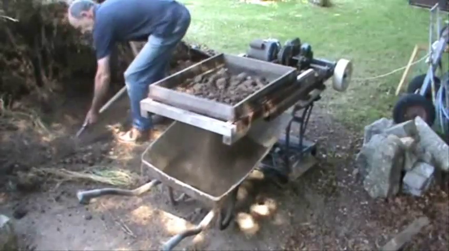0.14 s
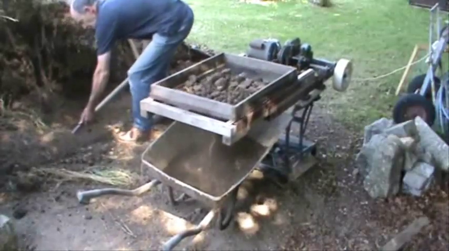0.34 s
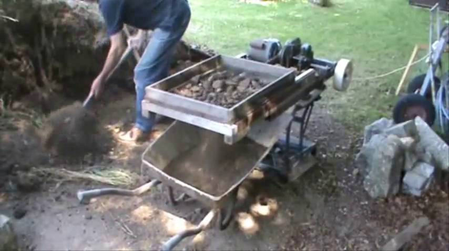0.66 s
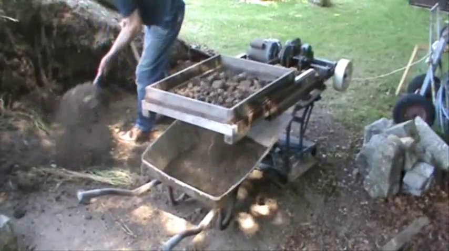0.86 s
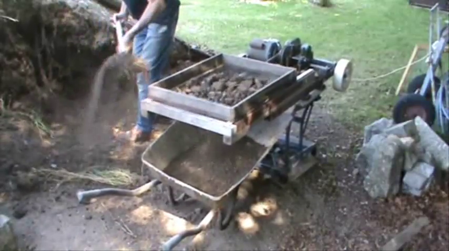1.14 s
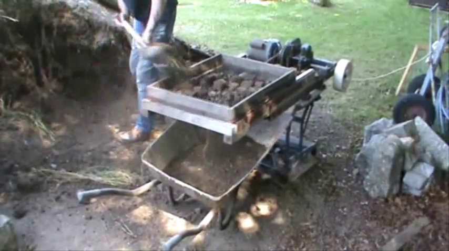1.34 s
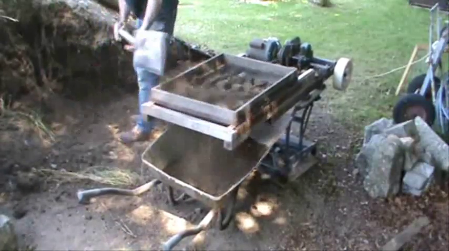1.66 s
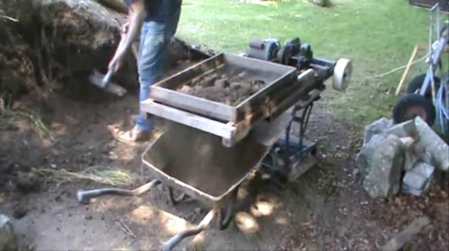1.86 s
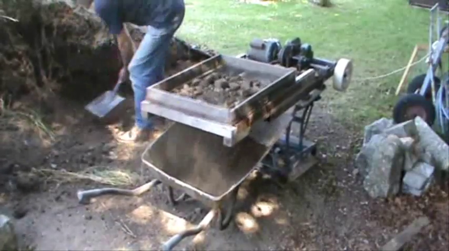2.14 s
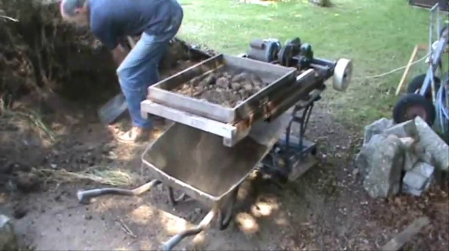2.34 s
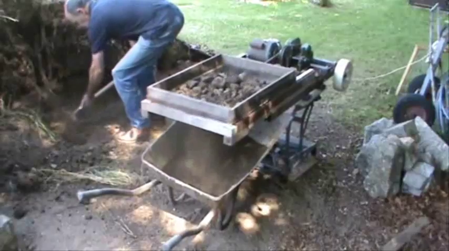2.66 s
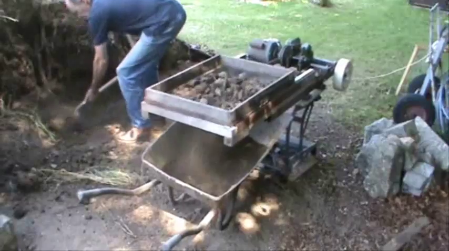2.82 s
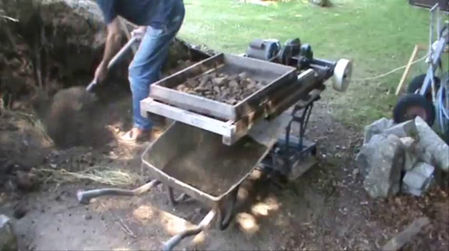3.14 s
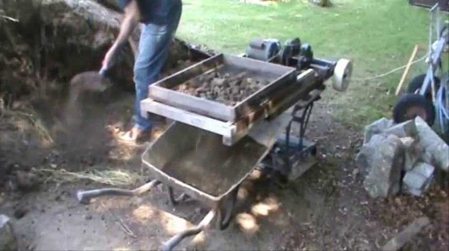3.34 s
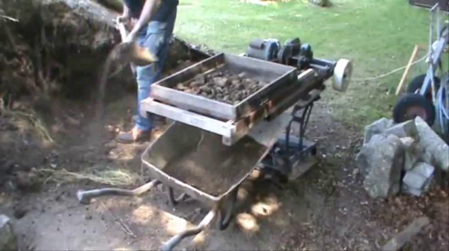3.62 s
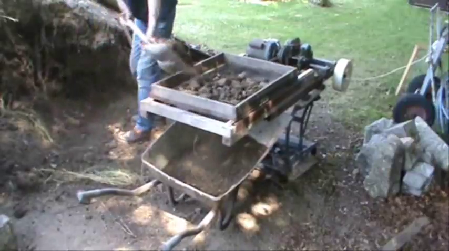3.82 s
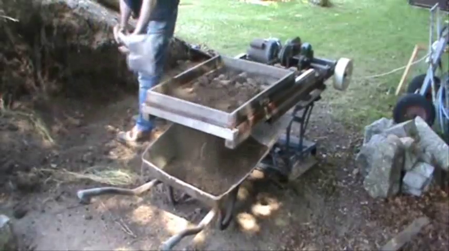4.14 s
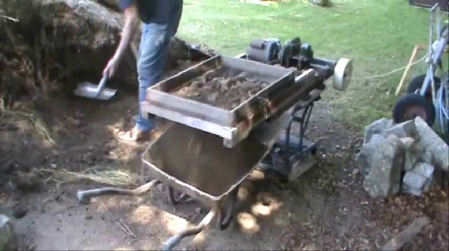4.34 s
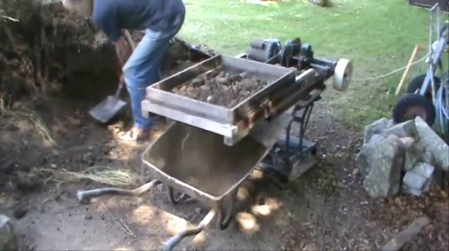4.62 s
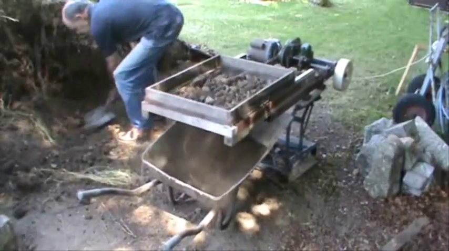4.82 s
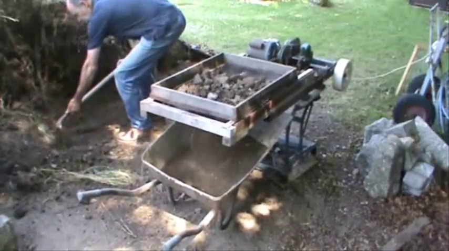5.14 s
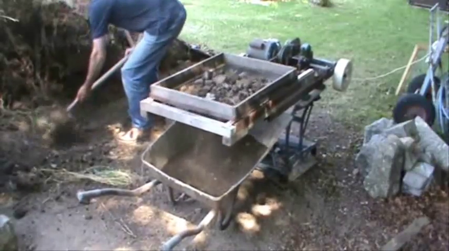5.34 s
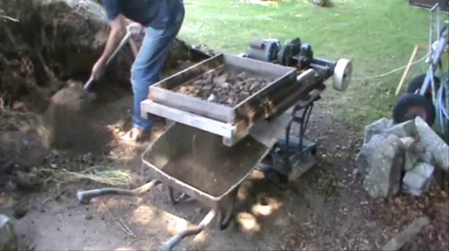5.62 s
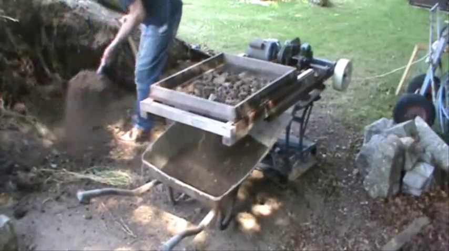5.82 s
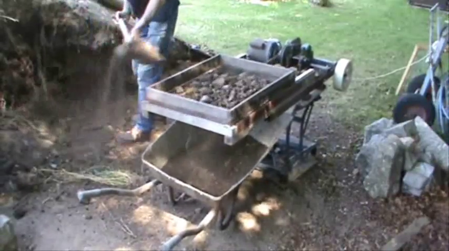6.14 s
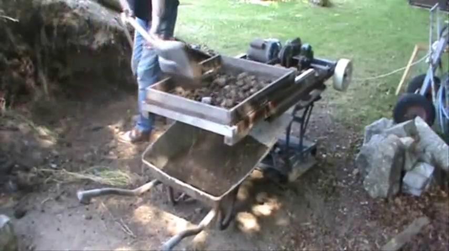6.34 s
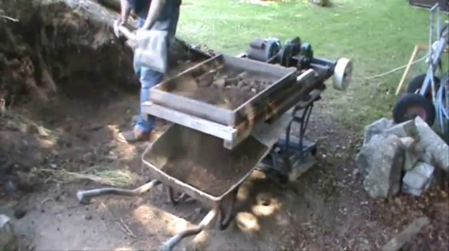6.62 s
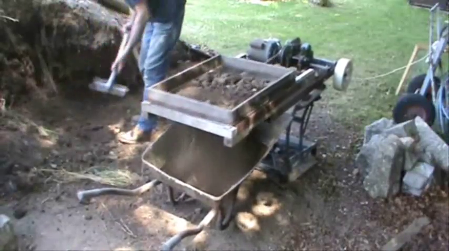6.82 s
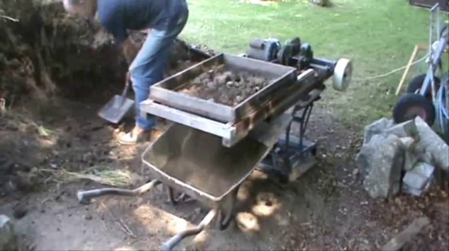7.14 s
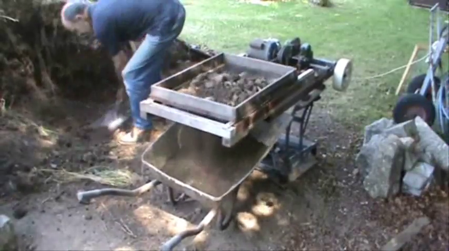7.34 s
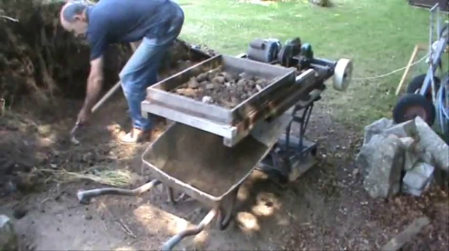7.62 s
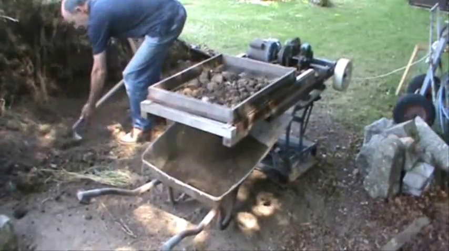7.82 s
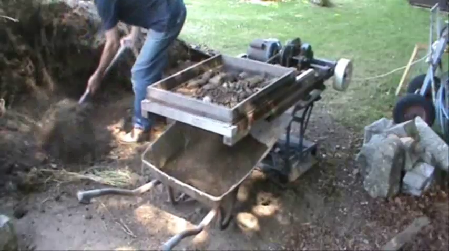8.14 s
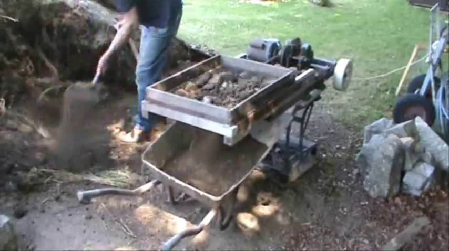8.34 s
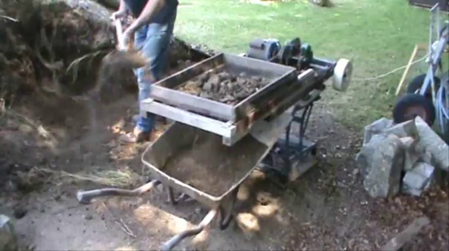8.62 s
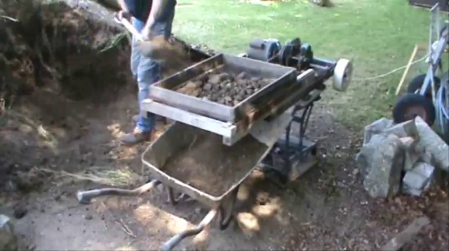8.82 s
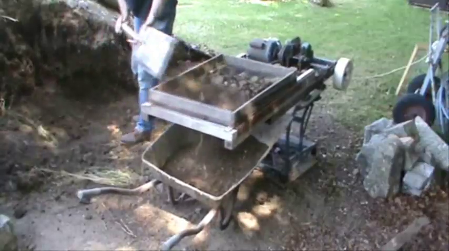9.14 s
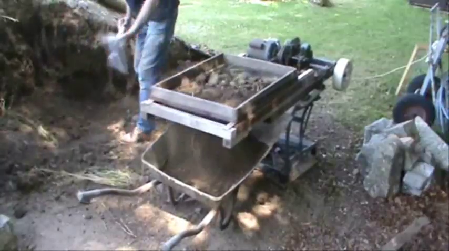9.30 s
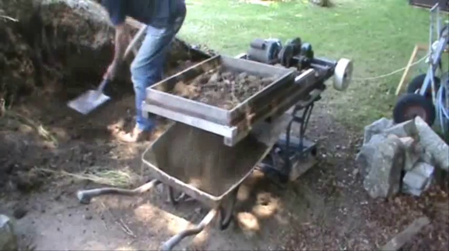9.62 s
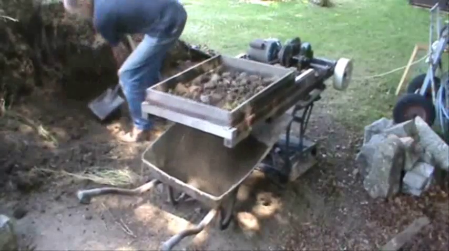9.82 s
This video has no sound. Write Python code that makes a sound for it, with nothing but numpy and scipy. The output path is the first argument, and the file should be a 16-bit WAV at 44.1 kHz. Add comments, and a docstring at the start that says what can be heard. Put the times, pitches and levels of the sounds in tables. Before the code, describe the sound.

Outdoors in a garden, a close stereo pair hears a motorised soil sieve already at full speed, and it never stops through the ten seconds. It shakes about 4.5 times a second: each stroke brings a dense, bright rattle of stones, hard slams as the load is thrown forward and back, a thin high ping from the steel mesh and a short hollow knock from the linkage. The wooden frame drums and chatters, clods thud irregularly, and fine soil hisses in pulses. Low motor and belt rumble lies underneath. A spade scrapes briefly through gritty ground at 0, 2.5, 5 and 7.4 seconds, each about a quarter second long. Heavy loads make the tray boom softly, mostly before 3 seconds, and occasionally up to 5.6. Sharp pebble ticks drop into a barrow throughout. The sound is dry, harsh and crowded, still running at the end.

```python
"""In a garden, before a microphone pair, a motor-driven soil sieve shakes at 4.5 strokes a second.
It is already running over its motor's rumble as a spade digs; the spade scrapes again near 2.5, 5 and 7.4 s.
Fine soil hisses from filtered grit, stones rattle in noise clicks and short rings, and the frame drums.
From the first strokes clods thud, the load slams, the mesh pings in sine modes and pebbles tick in a barrow.
The linkage knocks at the end of nearly every stroke, and some heavy loads make the hollow tray boom."""
import sys
import numpy as np
from scipy import signal
from scipy.fft import rfft, irfft, next_fast_len
from scipy.io import wavfile
from scipy.ndimage import map_coordinates

SR = 44100
rng = np.random.default_rng(int(sys.argv[2]) if len(sys.argv) > 2 else 0)


def wrap_up_sound(samples):
    """Save the sound to the file named by the first command line argument, as 16-bit audio."""
    columns = np.atleast_2d(samples).T
    # keep every value between -1 and 1, then stretch to whole-number steps
    tamed = np.clip(columns, -1, 1)
    steps = np.round(tamed * 32767).astype(np.int16)
    wavfile.write(sys.argv[1], SR, steps)


N = 439677


def amp(db):
    """Decibels to gain."""
    return np.exp(np.asarray(db) * (np.log(10) / 20))


def unit(x):
    """Scaled to rms 1."""
    return x / np.sqrt(np.mean(x ** 2) + 1e-20)


def along(points, hz):
    """(Hz, value) points read on a log frequency axis."""
    f, v = np.transpose(points)
    return np.interp(np.log(hz + 1), np.log(f + 1), v)


def curves(rows):
    """One value per sample for each column after the time."""
    s, *cols = np.transpose(rows)
    return [np.interp(np.arange(N) / SR, s, c) for c in cols]


def wobble(rate):
    """A smooth random curve, rate knots a second."""
    at = np.arange(0, N + 32, 32)
    knots = rng.standard_normal(int(N * rate / SR) + 4)
    return np.interp(np.arange(N), at, map_coordinates(knots, [at * rate / SR]))


def coloured(x, gain_db, size=8192):
    """x through a causal, minimum-phase filter with the given dB at each frequency."""
    cepstrum = irfft(np.log(amp(gain_db(np.fft.rfftfreq(size, 1 / SR))) + 1e-6))
    # folding the cepstrum forward makes the filter causal
    cepstrum[1:size // 2] *= 2
    cepstrum[size // 2 + 1:] = 0
    response = irfft(np.exp(rfft(cepstrum)))[:size // 2]
    return signal.oaconvolve(x, response)[:N]


def ring(x, hz, width_hz):
    """x through a steep-sided resonance: two equal stages, each of the given width."""
    stage = np.concatenate(signal.iirpeak(hz, hz / width_hz, SR))
    return signal.sosfilt([stage, stage], x)


def add(track, s, sound):
    """Mix a sound in at time s."""
    start = int(np.clip(round(s * SR), 0, N))
    track[start:start + len(sound)] += sound[:N - start]


def impacts(rate, spread_db):
    """Random contacts, rate a second, each of its own size."""
    at = np.flatnonzero(rng.random(N) < rate / SR)
    size = rng.choice([-1, 1], len(at)) * amp(spread_db * rng.uniform(-0.73, 1, len(at)))
    return unit(np.bincount(at, size, N))


def clumps(rate, life, depth):
    """Gain of a crowd of contacts that arrives in clumps: each starts at once and dies away."""
    starts = (rng.random(N) < rate / SR) * 1.0
    power = signal.lfilter([1], [1, -np.exp(-1 / (life * SR))], starts)
    return unit(np.sqrt(1 + depth * power))


def blow(modes, detune, crack_db):
    """One hard contact, peaking near 1: a brief crack and modes that differ a little every time."""
    t = np.arange(SR // 12) / SR
    ringing = np.zeros(len(t))
    for hz, db, t60 in modes:
        decay = amp(db + 1.3 * rng.normal() - 60 * t / t60)
        ringing += decay * np.sin(2 * np.pi * hz * (1 + detune * rng.normal()) * t)
    crack = amp(crack_db - 60 * t / .012) * ring(rng.standard_normal(len(t)), hz=1700, width_hz=2600)
    sound = ringing * (1 - np.exp(-t / .0004)) + crack
    return .4 * sound / sound[t < .01].std()


def rung(events, hz, spread, attack):
    """One dying tone for each (s, dB, t60 s) event, its pitch scattered around hz."""
    out, t = np.zeros(N), np.arange(SR // 5) / SR
    for (s, db, t60), tone in zip(events, rng.uniform(-1, 1, len(events))):
        envelope = amp(db - 60 * t / t60) * (1 - np.exp(-t / attack))
        add(out, s, envelope * np.sin(2 * np.pi * hz * (1 + spread * tone) * t))
    return out


# The crank's progress. Each row: time in seconds, turns completed.
CRANK_TURNS = [(0, .45), (1.217, 6), (2.31, 11), (3.622, 17), (4.279, 20), (5.599, 26), (6.475, 30),
               (7.567, 35), (8.664, 40), (9.979, 46)]


def each_turn(share):
    """The times at which the crank passes a given point of its turn."""
    s, turns = np.transpose(CRANK_TURNS)
    marks = np.arange(int(turns[-1])) + share
    return np.interp(marks[marks > turns[0]], turns, s)


SIZE_SCATTER_DB = 2.5


def falls(share, chance, db, scatter_s):
    """(s, dB) of things that land near one point of the turn, on some strokes only."""
    times = each_turn(share)
    late, size, luck = rng.random((len(times), 3)).T
    when = times + scatter_s * (2 * late - 1)
    levels = db + SIZE_SCATTER_DB * (2 * size - 1)
    return [(s, level) for s, level, draw in zip(when, levels, luck) if draw < chance]


# Resonances of the tray and its mesh. Each row: centre in Hz, width in Hz, peak or hollow in dB.
TRAY_RESONANCES = [(463, 32, 3.5), (598, 48, -3), (665, 48, 1), (703, 640, 4), (910, 51, -6.5),
                   (1065, 71, 1), (1410, 76, 4), (1620, 70, -0.5), (1890, 53, 2), (2250, 190, 0),
                   (2760, 79, -2.5), (3860, 160, 3), (4180, 120, 1.5), (4460, 110, 1.5), (6360, 150, 1.5)]


def tray_db(hz):
    """Peaks and hollows of the tray's response."""
    return sum(db / (1 + (2 * (hz - centre) / width) ** 2) for centre, width, db in TRAY_RESONANCES)


# Rumble of the motor and belt. Each row: frequency in Hz, relative spectrum in dB per Hz.
DRIVE_SPECTRUM = [(20, -64), (32, -32), (50, -9), (72, -3), (120, -2.5), (175, 1.5), (230, -1.5),
                  (400, -3.5), (1500, -36.5)]


def drive():
    """Motor, belt and pulleys rumble evenly under the rattle: steady filtered noise."""
    return amp(-38) * unit(coloured(rng.standard_normal(N), lambda hz: along(DRIVE_SPECTRUM, hz)))


# The spade thrust into stony ground. Each row: start in seconds, length in seconds, level in dB.
SPADE_THRUSTS = [(0, 0.18, -23.5), (2.55, 0.29, -26), (4.97, 0.25, -21), (7.442, 0.28, -21)]
# Its scrape. Each row: frequency in Hz, relative spectrum in dB per Hz.
SPADE_SPECTRUM = [(200, -19), (700, 1.5), (1400, -4.5), (2600, -0.5), (4500, -3), (7000, -10), (11000, -10),
                  (15000, -47)]


def spade():
    """Grit scrapes along the blade, swelling and fading with each thrust."""
    push = np.zeros(N)
    for s, length, db in SPADE_THRUSTS:
        add(push, s, amp(db) * np.sin(np.linspace(0, np.pi, int(length * SR))))
    grit = impacts(5000, spread_db=-1) * clumps(rate=180, life=0.0066, depth=0.51)
    return push * unit(coloured(grit, lambda hz: along(SPADE_SPECTRUM, hz)))


# The hiss of fine soil. Each row: frequency in Hz, relative spectrum in dB per Hz.
SOIL_SPECTRUM = [(2000, -20), (6000, 2), (8000, -2.5), (9800, 1), (11200, -1), (12800, -6), (14000, -16),
                 (15000, -62)]


def soil(level_db, flow_db):
    """Grit sprays through the mesh in little spurts that swell with each throw."""
    grit = impacts(13000 * amp(flow_db), spread_db=1.5) * amp(0.69 * flow_db)
    grit *= clumps(rate=45, life=0.0078, depth=1.0)
    return amp(level_db + 2.17) * unit(coloured(grit, lambda hz: along(SOIL_SPECTRUM, hz)))


def chips(throw_db, rate, life, size=400):
    """Hard, dry clicks of stone edges: each starts at once and is over in a few milliseconds."""
    at = np.flatnonzero(rng.random(N) < rate * amp(throw_db) / SR)
    strength = amp(rng.uniform(-3, 3, (len(at), 1)))
    fade = np.exp(-np.arange(size) / (life * SR))
    cracks = strength * rng.standard_normal((len(at), size)) * fade
    places = (at[:, None] + np.arange(size)).ravel()
    return unit(ring(np.bincount(places, cracks.ravel(), N)[:N], hz=3720, width_hz=5540))


def clinks(throw_db, rate, pitch_hz, spread, cycles, size=1200):
    """Single stones that stand out, each with a short ring of its own pitch."""
    at = np.flatnonzero(rng.random(N) < rate * amp(throw_db) / SR)
    tone, strength = rng.uniform(-1, 1, (2, len(at), 1))
    hz, t = pitch_hz * np.exp(spread * tone), np.arange(size) / SR
    rings = amp(4.0 * strength) * np.sin(2 * np.pi * hz * t) * np.exp(-t * hz / cycles)
    places = (at[:, None] + np.arange(size)).ravel()
    return unit(np.bincount(places, rings.ravel(), N)[:N])


# Stones by size, from clods to chips. Each row: pitch in Hz, width of each stage in Hz, relative level in dB.
STONE_SIZES = [(1083, 1060, -8), (1860, 1250, -8), (2686, 1030, -6.5), (3515, 1130, -7), (4460, 1280, -6),
               (5510, 2140, -8.5)]


def stones(level_db, throw_db):
    """Each size of stone clicks at its own pitch, thicker and harder each time the tray turns round."""
    rate = 2600 * amp(throw_db)
    clicks = sum(amp(db) * unit(ring(impacts(rate, spread_db=2), hz, width)) for hz, width, db in STONE_SIZES)
    clicks = unit(clicks) * clumps(rate=55, life=.008, depth=.4)
    clicks += amp(-6.5) * chips(throw_db, rate=230, life=.0014)
    # stone on stone, then stone on wire
    clicks += amp(-10) * clinks(throw_db, rate=200, pitch_hz=2455, spread=0.417, cycles=14.5)
    clicks += amp(-12.0) * clinks(throw_db, rate=85, pitch_hz=4330, spread=.22, cycles=95)
    return amp(level_db + 0.86) * unit(coloured(clicks * amp(0.42 * throw_db), tray_db))


def chatter(share, hz, width_hz, life, scatter_db=3, scatter_s=0.00352):
    """Once a turn a loose part chatters briefly and rings at its own pitch."""
    t, out = np.arange(SR // 8) / SR, np.zeros(N)
    fade = np.exp(-t / life)
    times = each_turn(share)
    bursts = ring(rng.standard_normal((len(times), len(t))) * fade, hz, width_hz)
    scatter = rng.uniform(-0.998, 1, (len(times), 2))
    for when, burst, (late, size) in zip(times, bursts, scatter):
        levelled = burst * np.linalg.norm(fade) / np.linalg.norm(burst)
        add(out, when + scatter_s * late, amp(scatter_db * size) * levelled)
    return out


# The frame's drumming. Each row: frequency in Hz, relative spectrum in dB per Hz.
FRAME_SPECTRUM = [(30, -46), (120, -15.5), (250, -7), (400, -1.5), (600, 1), (900, -6), (1400, -9),
                  (3000, -35)]
# Jolts in every stroke. Each row: share of a turn, level in dB, ring in Hz, width of each stage in Hz,
# chatter's decay in seconds.
FRAME_JOLTS = [(.1, -37.5, 145, 110, 0.015), (.12, -24, 1240, 452, 0.01), (.115, -29.5, 349, 170, 0.027),
               (.165, -31, 740, 260, 0.032), (.18, -39, 459.1, 50, 0.021), (.23, -25, 752, 170, 0.011),
               (.295, -20.5, 1600, 900, 0.005), (.32, -31, 715, 260, .009), (.49, -35, 458, 60, 0.027),
               (.535, -27.5, 350, 150, 0.0071), (.57, -27.5, 700, 260, 0.0049),
               (.555, -24.5, 1660, 1200, 0.018), (.555, -29, 1895, 80, 0.024), (.64, -33, 345, 160, 0.02),
               (.62, -25, 1340, 400, 0.011), (.65, -23, 735, 190, 0.0074)]


def frame(level_db, throw_db):
    """Clods drum on the wooden frame, which is jolted near the same points of every stroke."""
    hits = impacts(1400, spread_db=6.5) * amp(0.062 * throw_db) * clumps(rate=32, life=0.026, depth=0.78)
    drumming = unit(coloured(hits, lambda hz: along(FRAME_SPECTRUM, hz) + tray_db(hz)))
    jolts = sum(amp(db) * chatter(share, hz, width, life) for share, db, hz, width, life in FRAME_JOLTS)
    return amp(level_db - 1.4) * drumming + jolts + boom()


# The heaviest clods against the wood. Each row: time in seconds, peak in dB, approximately.
CLOD_THUDS = [(.017, -11.5), (.082, -15), (1.256, -15), (1.703, -19), (2.707, -15), (2.774, -17),
              (2.8, -12), (3.017, -12), (4.555, -17), (5.202, -19), (5.299, -16), (5.648, -14),
              (7.491, -14), (7.694, -12), (7.844, -20), (7.93, -16), (8.502, -14), (8.81, -11),
              (9.603, -17), (9.687, -13)]
# The frame's modes. Each row: pitch in Hz, relative level in dB, fall by 60 dB in seconds.
WOOD_MODES = [(460, -12, .05), (560, -11, .03), (675, -4, .04), (750, 0, .046), (815, -6, .03),
              (1060, -8, .02)]


def clods():
    """Heavy clods trail behind the stones and clack against the wood, exciting its modes."""
    out = np.zeros(N)
    after_forward = falls(share=0.19, chance=.3, db=-17.5, scatter_s=0.01205)
    later = falls(share=.6, chance=.3, db=-22, scatter_s=.014)
    for s, db in CLOD_THUDS + after_forward + later:
        add(out, s, amp(db) * blow(WOOD_MODES, detune=0.029, crack_db=6))
    return out


# The load slams into the front of the tray. Each row: time in seconds, relative level in dB.
FRONT_SLAMS = [(0.367, -5), (0.594, -7), (0.813, -11), (1.023, -2), (1.239, -1), (1.461, -3), (1.685, -5),
               (1.903, -4.5), (2.334, 1), (2.561, -12), (2.999, -6.5), (3.211, -4), (3.43, -2), (3.649, 0),
               (3.869, 0.5), (4.09, -4.5), (4.301, -8.0), (4.528, -14), (4.747, -1), (6.287, -8.0),
               (6.501, -1.5), (6.94, -6.0), (7.167, -3), (7.377, -9), (7.601, -8), (7.824, -11),
               (8.038, -1.5), (8.254, -10), (8.466, -5), (8.693, -4), (8.912, -9.5), (9.14, -10),
               (9.341, 0), (9.793, -7)]
# The load is thrown back; slams() and mesh() both play this.
# Each row: time in seconds, relative slam level in dB, relative ping level in dB.
RETURN_THROWS = [(0.03, -6, -24.0), (0.254, -10, -33.0), (0.473, -6.0, -29.0), (0.692, -3.5, -33.0),
                 (0.908, -7.5, -33.0), (1.129, -2, -28.0), (1.347, -3, -29.0), (1.565, -3.5, -25.5),
                 (1.788, -7.5, -27.0), (2.005, 0, -19.0), (2.224, -3, -29.0), (2.444, -6.5, -23),
                 (2.664, -6, -26.5), (2.88, -4, -24.0), (3.098, -0.5, -21.5), (3.313, -2.0, -32.0),
                 (3.539, -6, -27.0), (3.755, -4.5, -23.0), (3.97, -2, -25.0), (4.189, -3, -25.5),
                 (4.414, -6, -20), (4.634, -7, -25.5), (4.854, -4.0, -25.0), (5.074, -1.5, -20),
                 (5.292, -9, -19), (5.511, -3.0, -23.0), (5.729, -2, -27.0), (5.948, 1, -25.0),
                 (6.168, -7, -21.0), (6.386, -4, -18), (6.609, -5, -20), (6.822, -3, -19), (7.045, -3, -19),
                 (7.258, 0, -24.0), (7.484, -3, -20), (7.706, -4, -26.5), (7.924, -6, -21.0),
                 (8.142, -8, -20), (8.355, -4.5, -19), (8.575, 0, -21.5), (8.8, -3.0, -19),
                 (9.012, 0.5, -20.0), (9.237, -3, -20), (9.45, -1, -33.0), (9.679, -1, -24.0),
                 (9.899, -1.5, -29.0)]


def slams():
    """The load crashes down at either end of the throw: a hard smack, then a volley that dies away."""
    force, t = np.zeros(N), np.arange(SR // 8) / SR
    fall = .8 * amp(-60 * t / .045) + .5 * amp(-60 * t / .15)
    for s, db, *_ in FRONT_SLAMS + RETURN_THROWS:
        add(force, s, amp(db) * fall)
    volley = ring(force * rng.standard_normal(N), hz=3570, width_hz=4000)
    return amp(-8.5) * coloured(volley, tray_db)


# The steel mesh's modes. Each row: pitch in Hz, relative level in dB, fall by 60 dB in seconds.
MESH_MODES = [(4135, 5, .085), (4270, -5, .05), (4440, -3, .06)]


def mesh():
    """The return throw sets the steel mesh ringing, always with the same modes, slightly detuned."""
    out = np.zeros(N)
    for hz, db, t60 in MESH_MODES:
        pings = [(s, ping_db, t60) for s, _, ping_db in RETURN_THROWS]
        out += amp(db) * rung(pings, hz, spread=.007, attack=.0005)
    return out


# The loudest pebbles strike the barrow. Each row: time in seconds, relative level in dB.
LOUD_PEBBLES = [(0.7871, -9), (2.252, -8), (2.4623, -9), (3.408, -9), (5.3248, -9), (5.574, -8.5),
                (6.4181, -8), (8.5614, -10), (9.273, -11), (9.5266, -10)]
# Their tick. Each row: frequency in Hz, filter gain in dB.
TICK_SPECTRUM = [(2000, -30), (6000, -12), (8000, -3.5), (10500, 4.5), (12500, -1), (15000, -23)]
PEBBLES_AT = .82  # smaller pebbles drop through after the return throw (share of a turn)


def pebbles():
    """Sharp bright ticks with a brief sizzle: short bursts of filtered noise."""
    out, t = np.zeros(N), np.arange(SR // 10) / SR
    for s, db in LOUD_PEBBLES + falls(PEBBLES_AT, chance=.35, db=-13.5, scatter_s=0.026):
        add(out, s, amp(db - 3 - 60 * t / .08) * rng.standard_normal(len(t)))
    return coloured(out, lambda hz: along(TICK_SPECTRUM, hz))


# The linkage takes up its slack. Each row: time in seconds, relative peak in dB, brightness in dB before scaling.
LINKAGE_KNOCKS = [(0.116, -14, 4.0), (0.336, -9.5, 1.0), (0.55, -11, -4), (0.769, -11.0, -2),
                  (1.207, -12, -0.5), (1.427, -10.5, 1.0), (1.645, -11.5, 1), (1.864, -14.5, -3),
                  (2.082, -12.0, -3.0), (2.307, -10.5, 3), (2.524, -10.5, 0), (2.745, -9.0, -1.0),
                  (2.962, -12.5, 1.5), (3.184, -10, 6), (3.396, -12, 3), (3.615, -12, -5),
                  (3.837, -9.5, -5), (4.054, -10, 0), (4.27, -19.5, -3.0), (4.49, -10, -7),
                  (4.715, -11.5, 6), (4.933, -9.5, -0.5), (5.154, -13.5, 0.0), (5.369, -10.5, -2),
                  (5.592, -11, -3), (5.81, -11, 0.0), (6.03, -11.5, 0.0), (6.247, -12, -2.0),
                  (6.468, -10.5, 1.5), (6.687, -12, -1.5), (6.906, -13, -10), (7.134, -8, -4.0),
                  (7.57, -12.0, 2), (7.785, -12.5, 1), (8.008, -15, 2.0), (8.225, -11.5, -4),
                  (8.442, -12.5, 0), (8.662, -11, -4), (8.879, -12, 1), (9.098, -12, -2.5),
                  (9.311, -13, 0.5), (9.535, -15.5, -1.0), (9.758, -11.5, 0.5)]
# The knock's modes. Each row: pitch in Hz, relative level in dB, fall by 60 dB in seconds.
LINKAGE_MODES = [(775, -8.5, .06), (1165, -2, .05), (1235, -1, .042), (1300, -5, .034), (1390, -5, .034),
                 (1660, -9, .025)]
KNOCK_DETUNE = .013  # typical share by which a mode's pitch changes from knock to knock
KNOCK_PIVOT_HZ, KNOCK_SPAN_HZ = 1270, 130  # a bright blow favours the modes above the pivot


def linkage():
    """A short hollow knock at the end of nearly every stroke, now duller, now brighter."""
    out = np.zeros(N)
    for s, db, bright_db in LINKAGE_KNOCKS:
        modes = []
        for hz, level, t60 in LINKAGE_MODES:
            tilt = np.tanh((hz - KNOCK_PIVOT_HZ) / KNOCK_SPAN_HZ)
            modes.append((hz, level + .6 * bright_db * tilt, t60))
        add(out, s, amp(db + 0.3) * blow(modes, KNOCK_DETUNE, crack_db=4.0))
    return out


# The tray booms when a heavy load comes down after the forward throw.
# Each row: time in seconds, level in dB, fall by 60 dB in seconds.
TRAY_BOOMS = [(.165, -23, 0.16), (.402, -18, .07), (.44, -29, .08), (.612, -24.5, .2), (.828, -27, .15),
              (1.05, -31, .12), (1.282, -25, 0.13), (1.486, -25, .17), (1.715, -25, .12), (2.195, -27, .12),
              (2.362, -22, .11), (2.544, -28, .08), (2.8, -19, 0.097), (3.29, -29, .1), (3.9, -27, .12),
              (4.767, -25, .1), (5.63, -29, 0.078)]
# The tray bumps on its stand. Each row: time in seconds, relative level in dB.
STAND_BUMPS = [(.825, -20), (2.354, -21), (2.756, -26), (2.998, -18), (3.102, -22), (3.234, -26),
               (3.889, -20), (5.193, -19), (5.628, -18), (8.612, -24), (8.924, -24), (9.139, -16)]
# The stand's modes. Each row: pitch in Hz, relative level in dB, fall by 60 dB in seconds.
STAND_MODES = [(270, -7, .04), (335, 0, .06), (380, -3, .05), (460, -5, .05)]


def boom():
    """The hollow tray booms under the load in one low mode and bumps on its stand."""
    out = rung(TRAY_BOOMS, hz=172, spread=.05, attack=0.0027)
    for s, db in STAND_BUMPS:
        add(out, s, amp(db + 2.5) * blow(STAND_MODES, detune=.04, crack_db=-5))
    return out


# Diffuse sound around the pair. Each row: frequency in Hz, gain in dB.
DIFFUSE_GAIN = [(40, -7.5), (150, -11.5), (600, -14), (900, -10), (1600, -21.5), (4500, -21.5), (7000, -20),
                (8500, -13), (10000, -11), (12500, -16)]


def garden(x):
    """Scattered reflections, opposite in the two channels, add width, least from about 1.6 to 7 kHz."""
    t = np.arange(SR // 3) / SR
    tail = rng.standard_normal(len(t)) * amp(-60 * t / 0.13) * (t > .012)
    reflected = signal.oaconvolve(x, tail / np.linalg.norm(tail))[:N]
    echo = coloured(reflected, lambda hz: along(DIFFUSE_GAIN, hz))
    return np.array([x + echo, x - echo])


# One stroke. Each row: share of a turn, stones' rattle in dB and fine soil in dB, both before scaling.
STROKE_SHAPE = [(.02, -4, -3), (.114, -3, -2.5), (.135, -.3, -2), (.19, 1.92, 0.5), (.27, 0.71, 0.88),
                (.33, 1.67, 1.73), (.47, -2.5, -1.2), (.57, -0.9, -1.2), (.62, -0.77, -0.77),
                (.71, -0.14, 1.1), (.77, -0.73, 1.8), (.87, -0.83, 1.06), (.94, -1.93, -0.4)]
# The frame's drumming. Each row: time in seconds, relative level in dB.
DRUMMING_LEVEL = [(0, -26), (.8, -27), (1.4, -25), (2.3, -28), (2.8, -25), (3.5, -28.5), (4.5, -25),
                  (5.4, -28), (6.4, -26.5), (7.6, -26.5), (8.1, -26.5), (9.97, -25.5)]
# Fine soil falling through. Each row: time in seconds, relative level in dB.
FINES_LEVEL = [(0, -27), (2.7, -27), (3.9, -28), (5.0, -26.5), (6.0, -29.5), (7.4, -27), (8.2, -28.5),
               (9.97, -27)]
STONES_DB = -20  # relative level of the rattling stones
UNEVEN_DB, UNEVEN_RATE = 0.45, 4  # the load shifts about: depth, changes a second


def scene():
    """The crank paces the rattle, drumming and hiss, and the timed events join them."""
    turns, = curves(CRANK_TURNS)
    share, *stroke = np.transpose(STROKE_SHAPE)
    position = turns + .003 * wobble(6)  # the load slides a little early or late
    throw_db, flow_db = [np.interp(position, share, column, period=1) for column in stroke]
    levels_db = curves(DRUMMING_LEVEL)[0], STONES_DB, curves(FINES_LEVEL)[0]
    frame_db, stones_db, soil_db = [db + UNEVEN_DB * wobble(UNEVEN_RATE) for db in levels_db]
    machine = drive() + frame(frame_db, throw_db) + linkage()
    load = soil(soil_db, flow_db) + stones(stones_db, throw_db) + clods() + slams() + mesh() + pebbles()
    return garden(machine + load + spade())


# The microphone pair's phase. Each row: frequency in Hz, left channel's lead in radians.
PAIR_LEAD = [(30, -.4), (130, -1.05), (260, -1.25), (600, -.85), (900, -.38), (1400, 0)]
# The pair's balance. Each row: frequency in Hz, left over right in dB.
PAIR_TILT = [(50, -1.3), (200, -1.8), (330, -3), (600, -3), (780, -4.2), (1000, -2), (1400, 0)]
HEADROOM = .8  # the microphone's input rounds off the highest peaks near this amplitude
TOP_HZ = 14700


def record(dry):
    """Peaks are rounded; lows reach the right channel earlier and stronger; deepest bass and top are cut."""
    rounded = dry / (1 + (dry / HEADROOM) ** 6) ** (1 / 6)
    m = next_fast_len(N + 8192)
    hz = np.fft.rfftfreq(m, 1 / SR)
    # each channel takes half of the difference
    half = amp(along(PAIR_TILT, hz) / 2) * np.exp(1j * along(PAIR_LEAD, hz) / 2)
    low_cut = hz ** 2 / (hz ** 2 + 30 ** 2)
    spectrum = rfft(rounded, m) * np.array([half, 1 / half])
    return irfft(spectrum * low_cut * (hz < TOP_HZ), m)[:, :N]


dry = scene()
out = record(dry)
wrap_up_sound(out)
```